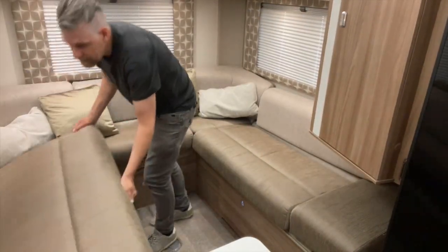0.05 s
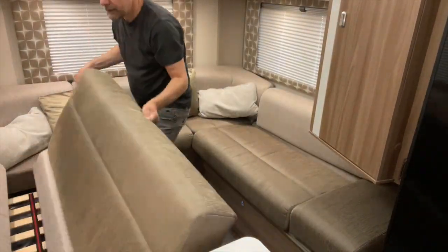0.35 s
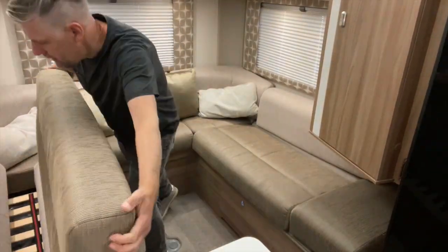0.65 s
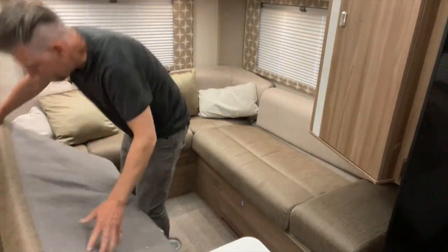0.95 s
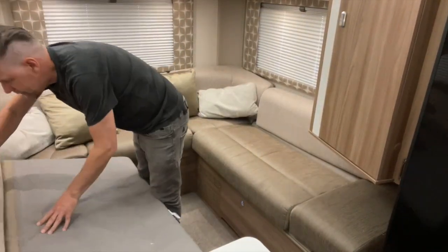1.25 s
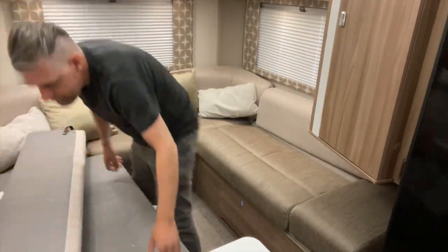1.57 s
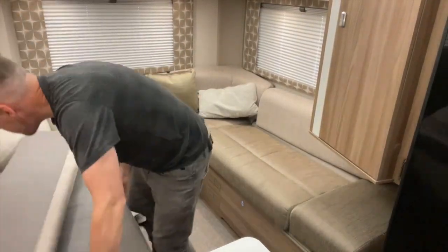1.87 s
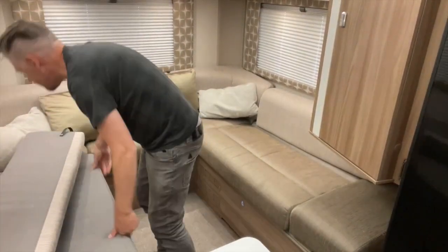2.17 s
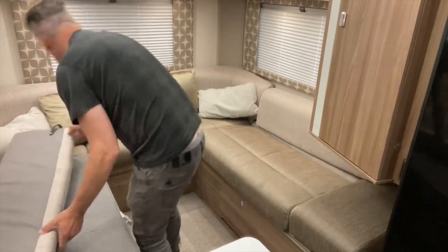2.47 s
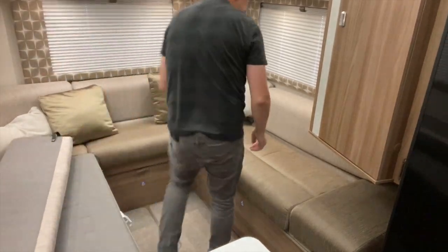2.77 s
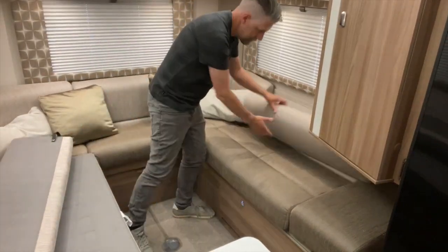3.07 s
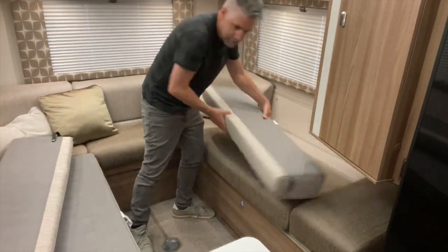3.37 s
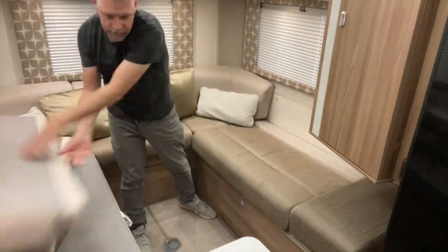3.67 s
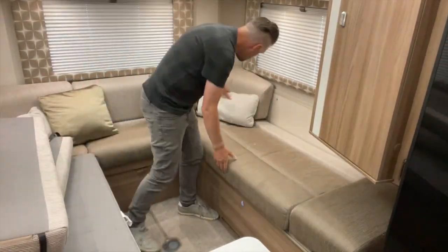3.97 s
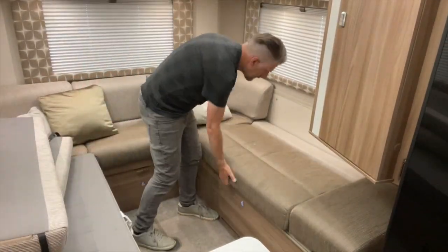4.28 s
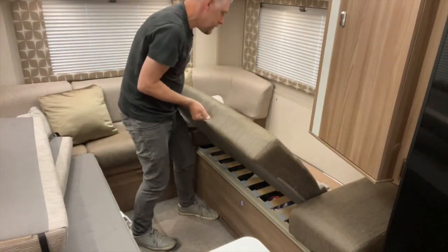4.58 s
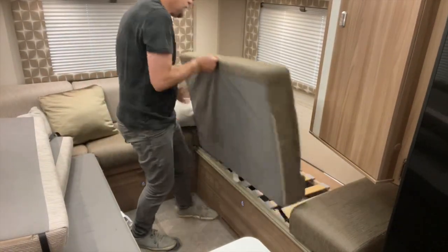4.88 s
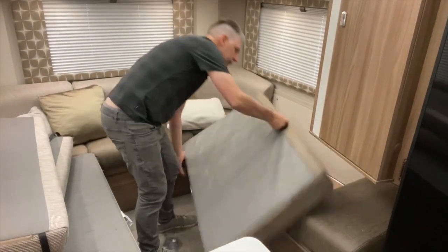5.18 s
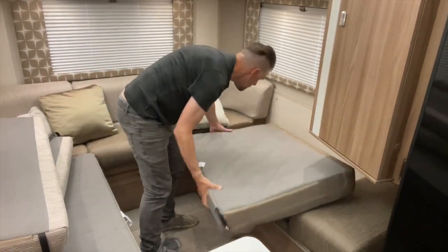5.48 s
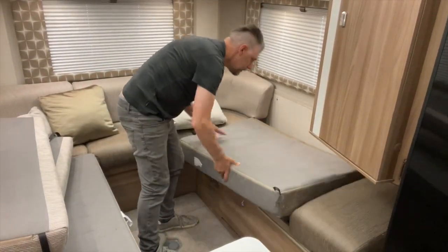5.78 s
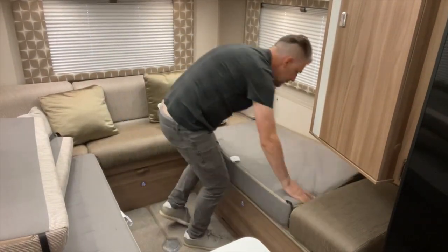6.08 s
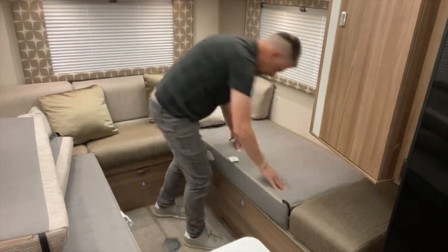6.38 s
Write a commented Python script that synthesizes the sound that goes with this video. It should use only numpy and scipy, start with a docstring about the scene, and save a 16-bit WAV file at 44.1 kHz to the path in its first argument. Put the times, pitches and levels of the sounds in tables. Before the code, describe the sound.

Close by in a small padded cabin, fabric drags and swishes as someone rearranges foam seat cushions. They scuff and land with muffled thuds, twice knocking on a hollow wooden base. Past the middle, a soft low rush rises and falls away while two sharp slat clacks sound. Small ticks, more rubbing cloth and a last few cushion bumps follow, all dry and fairly quiet.

```python
"""In a small camper, foam seat cushions are lifted, flipped and pushed onto slatted sofa bases.
Upholstery and clothes rustle as fibres slide and snag; hands swipe across the cloth.
Cushions scuff and thud on the hollow wooden boxes, zips tick, slats clack.
A dull rush swells and fades past the middle; the padded cabin answers very briefly."""
import sys
import numpy as np
from scipy import signal
from scipy.fft import rfft, irfft, next_fast_len
from scipy.io import wavfile
from scipy.ndimage import uniform_filter1d, map_coordinates

SR = 44100
rng = np.random.default_rng(int(sys.argv[2]) if len(sys.argv) > 2 else 0)


def dump(signal):
    """Clip the signal to [-1, 1] and save it as 16-bit WAV at the path in sys.argv[1]."""
    limited = np.clip(np.atleast_2d(signal).T, -1, 1)
    pcm = np.round(limited * 32767).astype(np.int16)
    wavfile.write(sys.argv[1], SR, pcm)


N = 288414
T = np.arange(N) / SR


def amp(db):
    return 10 ** (np.asarray(db) / 20)


def unit_rms(x):
    return x / np.sqrt(np.mean(x ** 2) + 1e-20)


def curve(rows, column=1):
    """Table column interpolated over time."""
    rows = np.asarray(rows)
    return np.interp(T, rows[:, 0], rows[:, column])


def bins_hz(size):
    return np.fft.rfftfreq(size, 1 / SR)


def colour(x, spectrum):
    """Filter by (frequency [Hz], gain [dB]) points on a log-frequency axis."""
    size = x.shape[-1]
    padded = next_fast_len(size + 2048, True)
    hz, db = np.transpose(spectrum)
    gain_db = np.interp(np.log(bins_hz(padded) + 1), np.log(hz), db)
    return irfft(rfft(x, padded) * amp(gain_db), padded)[..., :size]


def add(mix, start_s, sound):
    start = round(start_s * SR)
    sound = sound[max(-start, 0):]
    part = mix[max(start, 0):][:len(sound)]
    part += sound[:len(part)]


def flutter(rate_hz):
    """Smooth random unevenness, rms 1."""
    size = next_fast_len(N, True)
    spectrum = rfft(rng.standard_normal(size)) / (1 + (bins_hz(size) / rate_hz) ** 4)
    return unit_rms(irfft(spectrum, size)[:N])


def friction(size, snags_per_s, snag_share):
    """Sliding fibres hiss; single threads snag and release as tiny clicks."""
    snags = (rng.random(size) < snags_per_s / SR) * rng.standard_normal(size)
    hiss = rng.standard_normal(size)
    return np.sqrt(1 - snag_share) * hiss + np.sqrt(snag_share) * unit_rms(snags)


def stroke(sound, rise_s, fall_s, bluntness):
    """Level a sound, then shape it into one centred swell."""
    t = (np.arange(len(sound)) - len(sound) / 2) / SR
    steady = sound / np.sqrt(np.abs(uniform_filter1d(sound ** 2, size=600)) + 1e-12)
    return steady * np.exp(-np.abs(t / np.where(t < 0, rise_s, fall_s)) ** bluntness / 2)


# cushion drags: (start [s], length [s], level [dB])
DRAGS = [(0.0, 0.31, -58.5), (0.301, 0.16, -67), (0.481, 0.61, -68), (0.784, 0.18, -56.5), (1, 0.081, -58),
         (1.148, 0.29, -61.5), (1.402, 0.11, -59), (1.612, 0.6, -67.5), (1.971, 0.24, -68.5),
         (2.985, 0.3, -65), (3.313, 0.066, -60.5), (3.41, 0.36, -71.5), (4.417, 0.39, -63),
         (5.028, 0.028, -55), (5.157, 0.19, -59), (5.511, 0.11, -64), (5.655, 0.21, -60.5),
         (5.89, 0.3, -67), (6.023, 0.087, -62), (6.237, 0.082, -58)]


def drag_power(grab_s=.0017, release_s=.015):
    """Power envelope of loaded cushions: take hold, slide, let go."""
    power = np.zeros(N)
    for start_s, length_s, db in DRAGS:
        grab = np.clip((T - start_s) / grab_s, 0, 1)
        release = np.exp(-np.clip((T - start_s - length_s) / release_s, 0, 20))
        power += (amp(db) * grab * release) ** 2
    return power


def shifting_folds(cloth):
    """New folds keep touching, so the cloth's colour drifts in broad patches."""
    spectra = signal.stft(cloth, nperseg=512)[2]
    patches = uniform_filter1d(rng.standard_normal(spectra.shape), size=14, axis=0)
    patches_db = unit_rms(uniform_filter1d(patches, size=9, axis=1))
    return unit_rms(signal.istft(spectra * amp(patches_db), nperseg=512)[1][:N])


# cloth spectra, light touch and under load: (frequency [Hz], gain [dB])
SWISH_SPECTRUM = [(300, -5.5), (900, -13.5), (1500, -3), (2600, -4.5), (5000, -5.5), (8200, -4.5),
                  (14000, -17.5)]
RASP_SPECTRUM = [(120, -13), (210, -35.5), (310, 2.5), (560, 0.5), (1000, -8.5), (1400, -7), (2300, -18.5),
                 (5000, -29)]


def rustle(swish_db, rasp_db):
    """The weave swishes at a light touch and rasps lower under load."""
    swish = shifting_folds(colour(friction(N, snags_per_s=3000, snag_share=.18), SWISH_SPECTRUM))
    rasp = unit_rms(colour(friction(N, snags_per_s=700, snag_share=.18), RASP_SPECTRUM))
    grip_db = 1.2 * flutter(rate_hz=28)  # catch and release
    return swish * amp(swish_db + grip_db) + rasp * amp(rasp_db + 2 * grip_db)


# foam and floor: (frequency [Hz], gain [dB])
RUMBLE_SPECTRUM = [(18, -1.5), (55, -8.5), (125, -4), (700, -43)]


def rumble(rasp_db):
    """Foam and floor heave as the load is dragged."""
    level_db = -65 + .79 * (rasp_db + 63.5)
    return unit_rms(colour(rng.standard_normal(N), RUMBLE_SPECTRUM)) * amp(level_db)


# rush colour: (frequency [Hz], gain [dB])
RUSH_SPECTRUM = [(40, 18), (130, 6.5), (200, -3.5), (310, 2), (410, -6.5), (520, -2.5), (680, -11),
                 (830, -7), (1050, -18.5), (1300, -21), (2300, -36.5), (6000, -52)]
# rush envelope: (time [s], level [dB])
RUSH_LEVEL = [(1.2, -58), (2.85, -72.5), (3.5, -58), (3.82, -57.5), (4.08, -51.5), (4.33, -50.5),
              (4.6, -57), (5.1, -64), (6.3, -74)]


def rush(waver_db=2, waver_hz=6.4):
    """Dull, wavering, diffuse noise; only its bass is alike at both microphones."""
    common = rng.standard_normal(N)
    diffuse = colour(rng.standard_normal((2, N)), [(40, -9.5), (300, 3)])
    level_db = curve(RUSH_LEVEL) + waver_db * flutter(waver_hz)
    return unit_rms(colour(common + diffuse, RUSH_SPECTRUM)) * amp(level_db)


# cushion scuffs: (peak time [s], level [dB], length [s], boom [Hz])
SCUFFS = [(0.066, -51.5, 0.029, 600), (0.093, -44.5, 0.0026, 800), (0.732, -44, 0.0039, 590),
          (0.791, -41, 0.01, 590), (0.896, -30, 0.0055, 605), (0.942, -35, 0.0057, 660),
          (1.039, -42.5, 0.0052, 620), (1.235, -47.5, 0.009, 540), (1.288, -49.5, .008, 634),
          (1.34, -48, 0.0059, 427), (1.628, -47, 0.0038, 584), (1.814, -44.5, 0.0086, 564),
          (1.838, -54, 0.0047, 550), (1.908, -33, 0.0044, 564), (3.128, -52.5, 0.0046, 580),
          (4.535, -47.5, 0.0063, 450), (5.053, -46.5, 0.0085, 584), (5.654, -49, 0.01, 550),
          (5.684, -48.5, 0.0093, 520), (6.099, -41, 0.0068, 520), (6.268, -44.5, 0.0026, 530)]
# gap resonance: (frequency [x boom], gain [dB])
GAP_SPECTRUM = [(.1, -63), (.33, -22), (.53, -9), (1, 0), (1.65, -17.5), (2.2, -16.5), (3.6, -30),
                (13, -47.5)]


def scuffs(size=12000):
    """Stick-slip of a heavy cushion, booming in the gap over the hollow base."""
    out = np.zeros(N)
    for peak_s, db, length_s, boom_hz in SCUFFS:
        slips = friction(size, snags_per_s=1500, snag_share=.15)
        boom = unit_rms(colour(slips, [(ratio * boom_hz, gain_db) for ratio, gain_db in GAP_SPECTRUM]))
        add(out, peak_s - size / 2 / SR, amp(db) * stroke(boom, length_s, length_s, bluntness=1.2))
    return out


# sofa box and floor modes: (frequency [Hz], level [dB], T60 [s])
BOX_MODES = [(132, 7.5, 0.059), (279.3, -0.5, 0.072), (393, 7.5, 0.036), (571, 2, 0.028)]
# air from the foam: (frequency [Hz], gain [dB])
PUFF_SPECTRUM = [(25, 7.5), (85, 12), (200, -23.5), (330, 6.5), (600, 0.5), (1200, -9.5), (2500, -15),
                 (9000, -11)]


def blow(time_s, db, contact_s, ring_db, size=12000):
    """A blow rings the damped box and squeezes a puff from the foam; longer contact is duller."""
    out, t = np.zeros(N), np.arange(size) / SR
    cutoff_hz = 2.2 / contact_s
    ring = np.zeros(size)
    for k, (hz, mode_db, t60_s) in enumerate(BOX_MODES):
        mode = amp(mode_db - 60 * t / t60_s) * np.sin(2 * np.pi * hz * t)
        ring += (-1) ** k * mode / np.hypot(1, hz / cutoff_hz)
    ring *= 1 - np.exp(-(t / (1.1 * contact_s)) ** 2)  # padding rounds the onset
    add(out, time_s - .002, amp(db + ring_db) * ring / np.abs(ring).max())
    puff = colour(rng.standard_normal(size), PUFF_SPECTRUM)
    puff = irfft(rfft(puff) / np.hypot(1, bins_hz(size) / (.56 * cutoff_hz)), size)
    add(out, time_s - size / 2 / SR, amp(db) * stroke(puff, contact_s, contact_s, bluntness=3.1))
    return out


# soft blows: (time [s], level [dB], contact [s])
THUDS = [(.101, -38.5, 0.0025), (0.253, -45, 0.018), (0.898, -36.5, 0.0039), (1.274, -41, 0.0026),
         (1.482, -47.5, 0.016), (1.918, -26, 0.0045), (1.946, -45, 0.014), (2.549, -45, 0.0075),
         (3.186, -47, 0.01), (4.155, -43.5, 0.0051), (4.754, -40.5, 0.0046), (5.274, -37, 0.00097),
         (5.344, -42, 0.0062), (5.533, -48.5, 0.0076), (6.065, -44.5, 0.0079), (6.113, -41, 0.0096),
         (6.265, -36, 0.0049)]


def thuds():
    """Cushions, hands and feet land softly: mostly puff."""
    return sum(blow(*row, ring_db=-3) for row in THUDS)


def resonance(x, centre_hz, width_hz):
    """Steep-skirted noise band along a gliding centre."""
    low_passed = irfft(rfft(x) / (1 + (bins_hz(len(x)) / width_hz) ** 2), len(x))
    return low_passed * np.cos(2 * np.pi * np.cumsum(centre_hz) / SR)


# cloth swipes: (peak time [s], level [dB], fall [s], centre [Hz], width [Hz])
SWIPES = [(0.184, -41, 0.012, 3144, 1370), (0.816, -42, .006, 3700, 2800), (0.897, -42, 0.0076, 2946, 9000),
          (1.922, -38, 0.0072, 7030, 1530), (4.852, -36.5, 0.0032, 2080, 1700),
          (4.895, -44.5, 0.004, 1727, 3800), (4.961, -56, 0.0059, 1900, 4040)]
# hollow body under a swipe, also a slat's crack: (frequency [Hz], gain [dB])
BODY_SPECTRUM = [(200, -20), (350, 1), (650, 2), (1400, 4.5), (12000, -50)]


def swipes(sink_octaves_per_s=15, rise_ratio=1.31, body_db=-12, size=16000):
    """A quick slip plucks the weave; its band sinks as the cloth brakes."""
    out, t = np.zeros(N), (np.arange(size) - size / 2) / SR
    for peak_s, db, fall_s, centre_hz, width_hz in SWIPES:
        threads = friction(size, snags_per_s=6000, snag_share=.4)
        sinking_hz = centre_hz * 2 ** np.clip(-sink_octaves_per_s * t, -1, .5)
        weave = colour(resonance(threads, sinking_hz, width_hz), [(500, -14), (1300, 5)])
        body = colour(threads, BODY_SPECTRUM)
        slip = unit_rms(weave) + amp(body_db) * unit_rms(body)
        add(out, peak_s - size / 2 / SR, amp(db) * stroke(slip, rise_ratio * fall_s, fall_s, 1.3))
    return out


# light brushes: (peak time [s], level [dB], length [s])
BRUSHES = [(0.208, -53, 0.034), (0.38, -65.5, 0.033), (0.76, -61, 0.059), (1.211, -60, 0.044),
           (1.36, -69.5, 0.016), (1.41, -59, 0.0071), (1.57, -70, 0.16), (1.7, -65.5, 0.025),
           (2.096, -63, 0.0087), (2.358, -71, 0.031), (2.494, -62, 0.055), (2.714, -70, 0.036),
           (2.909, -63, 0.022), (3.608, -66.5, 0.034), (3.717, -61, 0.023), (4.047, -62, 0.015),
           (4.371, -57, 0.03), (4.572, -63, 0.016), (5.103, -69, 0.014), (5.261, -56.5, 0.0069),
           (5.437, -74, 0.094), (6.395, -68, 0.013), (6.479, -64.5, 0.015)]


def brush_power(bluntness=2.78):
    """Power envelope of sleeves, trouser legs and hands brushing past."""
    return sum(amp(db) ** 2 * np.exp(-np.minimum(np.abs(T - peak_s) / length_s, 10) ** bluntness)
               for peak_s, db, length_s in BRUSHES)


# hard blows: (time [s], level [dB], contact [s])
KNOCKS = [(1.901, -43.5, 0.003), (1.91, -44.5, 0.0021), (3.713, -38, 0.0033)]


def knocks():
    """Hard blows reach the wood: mostly ring."""
    return sum(blow(*row, ring_db=17.5) for row in KNOCKS)


def crack(t60_s, spectrum, size=2000):
    """Abrupt, decaying noise burst, energy 1."""
    burst = colour(rng.standard_normal(size), spectrum) * amp(-60 * np.arange(size) / SR / t60_s)
    return burst / np.linalg.norm(burst)


# zip and seam ticks: (time [s], energy [dB])
TICKS = [(2.272, -42), (5.009, -28), (5.05, -30), (5.974, -26)]
# tick colour: (frequency [Hz], gain [dB])
TICK_SPECTRUM = [(2000, -1), (14000, -6)]


def ticks(t60_s=.015):
    """Zips and seams tick against the wood."""
    out = np.zeros(N)
    for time_s, db in TICKS:
        add(out, time_s, amp(db) * crack(t60_s, TICK_SPECTRUM))
    return out


# slat strikes: (time [s], energy [dB], pitch [Hz])
CLACKS = [(4.533, -14.5, 2150), (4.8528, -10, 1375)]
# slat modes: (frequency [x pitch], level [dB])
SLAT_MODES = [(.42, -8), (1, 4), (1.25, 1.5), (1.95, -3.5), (2.6, -8.5)]


def clacks(t60_s=.0058, crack_db=-8, touch_lead_s=.0025, touch_db=-9, size=2000):
    """As the cushion leaves it, a slat touches its frame, then strikes it and rings briefly."""
    out, t = np.zeros(N), np.arange(size) / SR
    for time_s, db, hz in CLACKS:
        ring = sum((-1) ** k * amp(mode_db - 60 * t / t60_s) * np.sin(2 * np.pi * ratio * hz * t)
                   for k, (ratio, mode_db) in enumerate(SLAT_MODES))
        clack = ring / np.linalg.norm(ring) + amp(crack_db) * crack(t60_s / 2, BODY_SPECTRUM)
        add(out, time_s - touch_lead_s, amp(db + touch_db) * clack)
        add(out, time_s, amp(db) * clack)
    return out


def reflections(t60_s=.047, density=.15, size=4096):
    """Sparse stereo echoes, soon absorbed by the padding."""
    t = np.arange(size) / SR
    taps = rng.choice([-1., 1.], (2, size)) * (rng.random((2, size)) < density) * (t > .001)
    tail = taps * amp(-60 * t / t60_s)
    return tail / np.linalg.norm(tail, axis=1, keepdims=True)


# handling position: (time [s], left lead [ms], left minus right [dB])
POSITION = [(1.8, -0.18, -3), (3, -0.036, -3.5), (5, 0.16, -2.95)]
# direct and reflected paths: (frequency [Hz], gain [dB])
DIRECT_SPECTRUM = [(130, 0.5), (195, -0.5), (280, -3), (550, -7), (5000, -16)]
ECHO_SPECTRUM = [(50, -32), (130, -12), (280, -11), (550, -3), (6000, -10)]
# standing-wave dip at the left microphone: (frequency [Hz], gain [dB])
LEFT_DIP = [(350, 2), (600, -1), (1200, 2.5)]


def cabin(x, grain_size=1000):
    """Direct sound at two close microphones; each new spot of contact has its own reflections."""
    lead_s = curve(POSITION) / 1000
    direct = np.array([map_coordinates(x, [(T + side * lead_s) * SR], order=3) for side in (.5, -.5)])
    window = np.sin(np.pi * np.arange(grain_size) / grain_size)
    padded, echoes = np.pad(x, grain_size), np.zeros((2, N))
    for start in range(-grain_size // 2, N, grain_size // 2):
        grain = padded[start + grain_size:][:grain_size] * window
        for channel, echo in zip(echoes, signal.fftconvolve(grain[None], reflections(), axes=1)):
            add(channel, start / SR, echo)
    left, right = colour(direct, DIRECT_SPECTRUM) + colour(echoes, ECHO_SPECTRUM)
    balance_db = np.outer([.5, -.5], curve(POSITION, column=2))
    return np.array([colour(left, LEFT_DIP), right]) * amp(balance_db)


def scene():
    """Handling sounds in the cabin, over the dull rush."""
    drag_swish_db, brush_rasp_db, idle_db = -7.5, .5, -82.5
    dragging, brushing = drag_power(), brush_power()
    idle = amp(idle_db) ** 2  # clothes never quite rest
    swish_db = 10 * np.log10(dragging * amp(drag_swish_db) ** 2 + brushing + idle)
    rasp_db = 10 * np.log10(dragging + brushing * amp(brush_rasp_db) ** 2 + idle)
    sliding = rustle(swish_db, rasp_db) + rumble(rasp_db) + scuffs() + swipes()
    impacts = thuds() + knocks() + ticks() + clacks()
    return cabin(sliding + impacts) + rush()


# overall tone: (frequency [Hz], gain [dB])
TONE_SPECTRUM = [(20, -20.5), (60, -3), (9300, 11), (11000, -17), (13300, 4), (15500, -6.5)]
BAND_LIMIT_HZ = 15700


def record(dry):
    """Overall tone: thin bass, bright treble, a hole near 11 kHz; then the band limit."""
    low_pass = signal.firwin(511, BAND_LIMIT_HZ, window=("kaiser", 9), fs=SR)
    return signal.oaconvolve(colour(dry, TONE_SPECTRUM), low_pass[None], "same")


dry = scene()
out = record(dry)
dump(out)
```